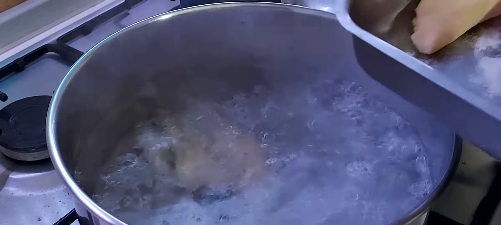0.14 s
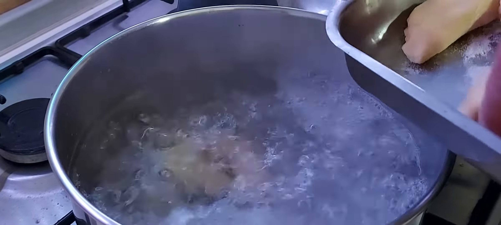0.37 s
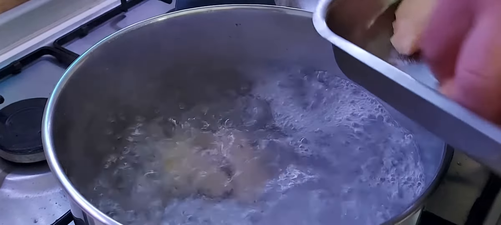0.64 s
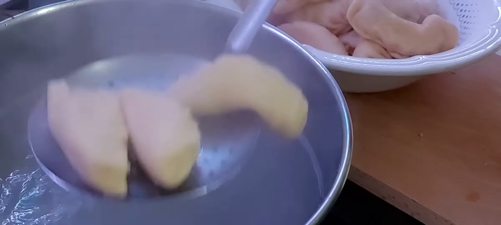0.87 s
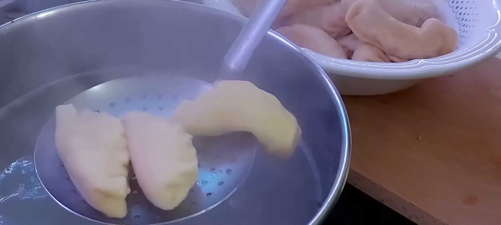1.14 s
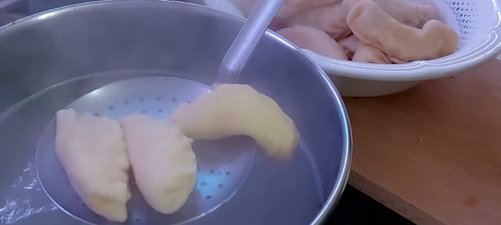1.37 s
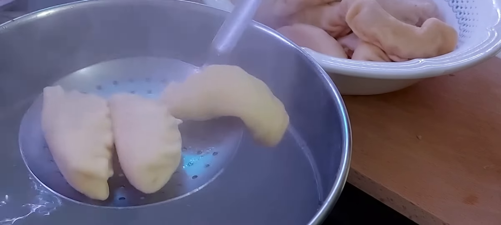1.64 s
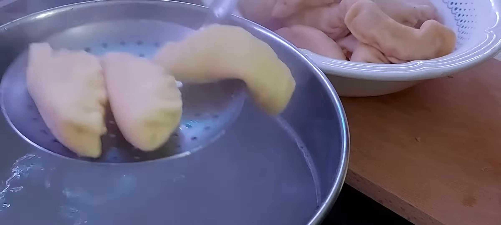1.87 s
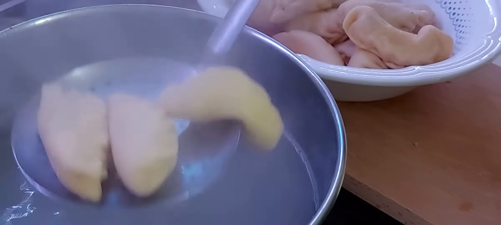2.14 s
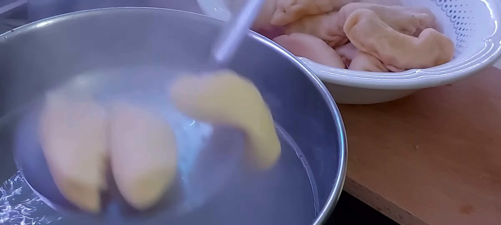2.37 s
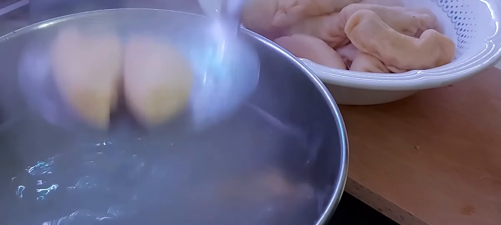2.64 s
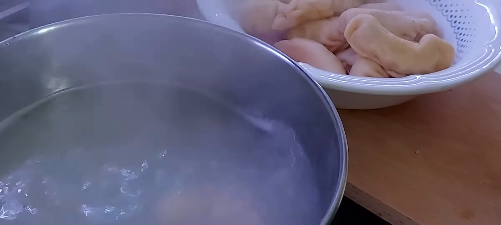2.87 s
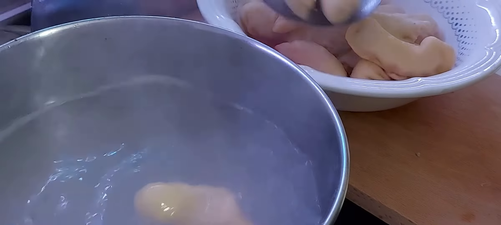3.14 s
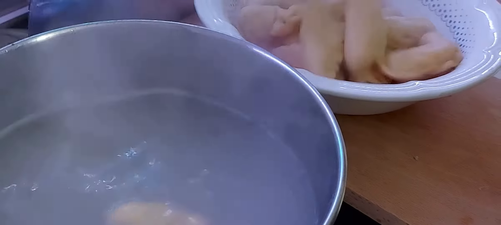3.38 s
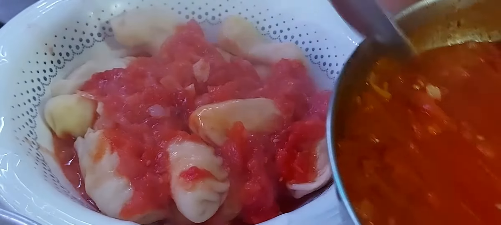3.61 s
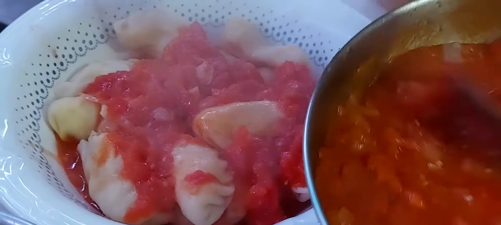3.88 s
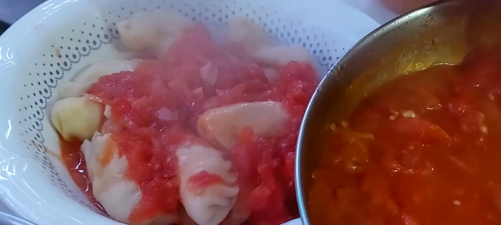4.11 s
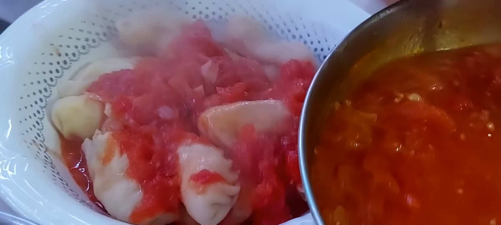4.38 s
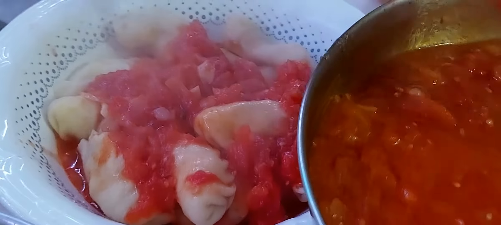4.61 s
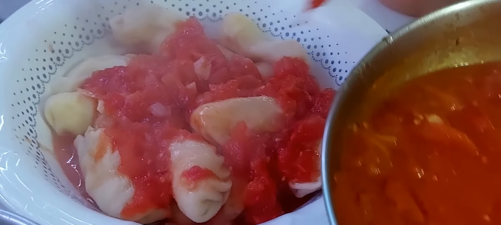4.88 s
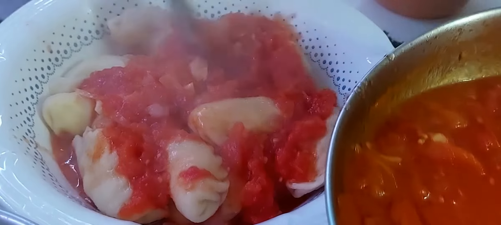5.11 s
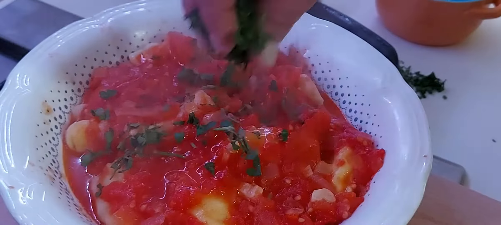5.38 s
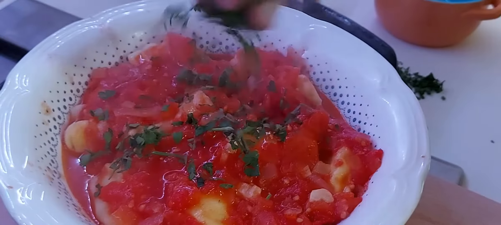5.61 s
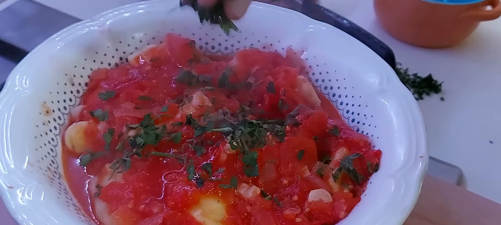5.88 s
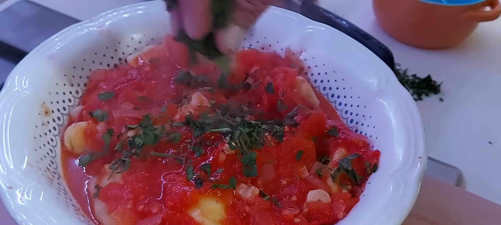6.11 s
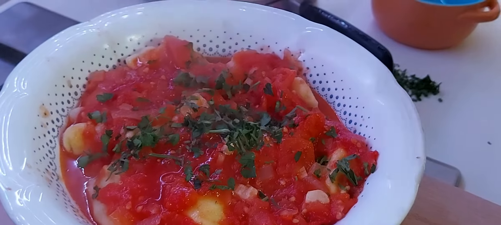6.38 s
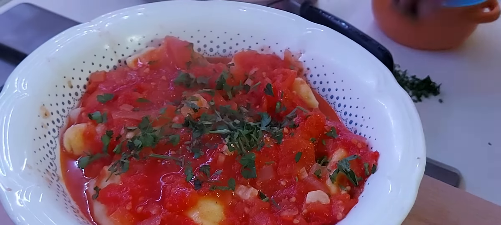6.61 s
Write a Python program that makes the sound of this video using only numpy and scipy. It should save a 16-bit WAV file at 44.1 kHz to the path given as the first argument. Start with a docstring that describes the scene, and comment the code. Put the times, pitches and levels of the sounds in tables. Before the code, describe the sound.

Water boils hard close by with one tray knock, cuts off abruptly, then quiet drips, and a spoon clinks and scrapes loudly in a metal pan.

```python
"""A spoon clinks, scrapes and thuds in a sauce pan: struck modes ring down, grit keeps them singing. Before it,
in a first scene, a pot boils close by until the scene changes, and a metal tray is knocked: more ringing modes.
Drips fall, food lands and herbs are sprinkled as ticks and puffs of noise; a ceramic bowl hums on two wavering
sines. Under all lie a lumpy low hum, the room tone and the microphone's hiss, as shaped noise."""
import sys
import numpy as np
from scipy import signal
from scipy.fft import rfft, irfft, next_fast_len
from scipy.io import wavfile
from scipy.ndimage import uniform_filter1d

SR = 44100
rng = np.random.default_rng(int(sys.argv[2]) if len(sys.argv) > 2 else 0)


def dump(signal):
    """Clip the signal to [-1, 1] and save it as 16-bit WAV at the path in sys.argv[1]."""
    limited = np.clip(np.atleast_2d(signal).T, -1, 1)
    pcm = np.round(limited * 32767).astype(np.int16)
    wavfile.write(sys.argv[1], SR, pcm)


def volts(x):
    """Linear amplitude factor 10**(x/20) for a level x in dB, scalar or array-like."""
    e = np.asarray(x, float) / 20
    return 10 ** e


N = 297673   # samples
BOIL_END_S = 0.738   # the scene changes here; the close boiling is heard only before it
CHOP_S = 5.287   # the ringing is chopped short here


def rms_one(x):
    """Scales to rms 1."""
    return x / np.sqrt(np.mean(x ** 2) + 1e-20)


def in_time(rows, outside=None):
    """Columns of a curve over time, one value a sample."""
    s, *columns = np.transpose(rows)
    return [np.interp(np.arange(N) / SR, s, c, outside, outside) for c in columns]


def at_hz(points, hz):
    """Reads a spectrum on a log frequency axis; nearly silent outside it."""
    point_hz, db = np.transpose(points)[:2]
    return np.interp(np.log(hz + 1), np.log(point_hz), db, -99, -99)


def drift(rate):
    """Slow random wander of spread 1, with `rate` new values a second."""
    knots = rng.standard_normal(400)
    path = np.interp(np.arange(N) * rate / SR, np.arange(400), knots)
    return rms_one(uniform_filter1d(path, size=400))


def coloured(x, spectrum):
    """Shapes the spectrum; rms 1."""
    size = next_fast_len(x.shape[-1])
    hz = np.arange(size // 2 + 1) * SR / size
    shaped = irfft(rfft(x, size) * volts(at_hz(spectrum, hz)), size)
    return rms_one(shaped[..., :x.shape[-1]])


# how alike the two ears are: (frequency [Hz], left-right likeness [-1 to 1])
LIKENESS = [(40, 0.93), (130, 0.9), (290, 0.78), (640, 0.31), (1400, -.05)]


def wide_noise():
    """Stereo noise, alike in the bass and almost unrelated in the treble."""
    hz = np.arange(N // 2 + 1) * SR / N
    point_hz, likeness = np.transpose(LIKENESS)
    alike = np.clip(np.interp(np.log(hz + 1), np.log(point_hz), likeness), -1, 1)
    mid, side = rfft(rng.standard_normal((2, N)))
    return irfft(np.sqrt(1 + alike) * mid + np.sqrt(1 - alike) * side * [[1], [-1]], N)


def panned(x, db):
    """Places a sound by its left-right level difference."""
    return x * volts(np.array([db / 2, -db / 2]).reshape(2, -1))


def band(x, lo_hz, hi_hz):
    """Band-pass filter."""
    return signal.sosfilt(signal.butter(2, [lo_hz, hi_hz], "band", fs=SR, output="sos"), x)


def ring(clicks, hz, t60):
    """A unit click sets a dying sine of starting height 1 ringing."""
    r, w = volts(-60 / (t60 * SR)), 2 * np.pi * hz / SR
    return signal.lfilter([0, np.sin(w)], [1, -2 * r * np.cos(w), r * r], clicks + 1e-18)


def grains(per_s, spread_db):
    """Random clicks of uneven size and either sign."""
    sizes = volts(spread_db * np.minimum(rng.exponential(1, N), 5)) * rng.choice([-1, 1], N)
    return sizes * (rng.random(N) < per_s / SR)


def add(out, x, s):
    """Mixes x into out, starting at s seconds."""
    at = round(s * SR)
    out[:, at:at + x.shape[1]] += x[:, :N - at]


# hiss spectrum: (frequency [Hz], density [dB per Hz])
HISS = [(530, -35), (900, -2.5), (956, -8), (1150, -9), (1230, -11), (1340, -9), (1630, -11.5), (2290, -7),
        (2750, -11.5), (3550, -8.5), (4360, -1.5), (7910, -4.5), (12100, 1), (15600, -9), (16400, -21)]


def microphone_hiss():
    """Steady noise of the microphone, unrelated in the two ears."""
    return volts(-61.5) * coloured(rng.standard_normal((2, N)), HISS)


# room spectrum: (frequency [Hz], density [dB per Hz])
ROOM_TONE = [(15, -58), (25, -15.5), (54, -9.5), (70, -5.5), (107, -12), (132, -5), (170, -27), (257, -11),
             (280, -10), (437, -27), (476, -26), (659, -30.5), (824, -25), (928, -46.5), (1500, -61.5),
             (1950, -68), (3300, -120)]
# room tone over time: (time [s], level [dB])
ROOM_LEVEL = [(0.76, -62), (1.29, -56.5), (1.6, -60.5), (2.19, -57), (2.56, -60.5), (3.45, -59),
              (3.9, -54.5), (4.3, -55), (4.88, -60.5), (5.26, -55), (5.6, -61.5), (6.25, -54.5),
              (6.75, -59.5)]


def room_tone():
    """Low, wide noise of the room, its level wandering."""
    level_db = in_time(ROOM_LEVEL)[0] + 1.8 * drift(11.0)
    return volts(level_db) * coloured(wide_noise(), ROOM_TONE)


# low hum over time: (time [s], level [dB])
HUM = [(0.0, -45.5), (0.21, -41.5), (0.28, -51), (0.38, -32), (0.49, -39.5), (0.71, -39), (0.77, -58.5),
       (1.71, -57), (1.94, -69), (1.97, -50), (2.59, -63.5), (3.03, -54.5), (3.31, -65), (3.87, -50),
       (3.97, -60), (4.08, -41.5), (4.3, -66), (4.4, -54), (5.86, -62), (5.96, -48.5), (6.45, -58),
       (6.56, -48), (6.6, -74), (6.75, -56)]
HUM_HZ, HUM_CLOSE_HZ, HUM_WAVER_HZ = 105.4, 115.7, 3.7   # far, near the burner, spread of the waver
HUM_LUMPS_PER_S, HUM_STEADY = 22, 0.8   # rate of the lumps; steady share beside lumps of spread 1


def low_hum():
    """One sine of wavering pitch and lumpy strength, higher near the burner."""
    near_burner = np.arange(N) / SR < BOIL_END_S
    hz = np.where(near_burner, HUM_CLOSE_HZ, HUM_HZ) + HUM_WAVER_HZ * drift(6)
    phase = 2 * np.pi * np.cumsum(hz) / SR
    lumps = (HUM_STEADY + drift(HUM_LUMPS_PER_S)) * np.sin(phase)
    lumps = lumps + drift(HUM_LUMPS_PER_S) * np.cos(phase)
    return volts(in_time(HUM)[0]) * rms_one(lumps)


# the boil over time: (time [s], rumble level [dB], bubbles level [dB], steam level [dB])
BOIL = [(0.0, -45.5, -54.5, -52.5), (0.136, -42.5, -54.5, -46.5), (0.29, -39.5, -52, -49),
        (0.424, -36, -49, -40), (0.578, -42, -52, -45.5), (0.702, -48, -55, -49), (0.735, -45, -50.5, -49)]
# rumble spectrum: (frequency [Hz], density [dB per Hz])
BOIL_RUMBLE = [(18, -39), (30, -13), (114, -1.5), (134, -4), (182, -17.5), (305, -11.5), (415, -21.5),
               (564, -19), (1000, -23), (1300, -46), (2200, -120)]
# steam spectrum: (frequency [Hz], density [dB per Hz])
STEAM = [(880, -36.5), (1500, -6), (2130, -4), (3480, -5.5), (4290, -2.5), (7900, -6), (11600, -4),
         (15400, -10), (16400, -32)]
# bursts of steam and spatter:
# (time [s], length [s], level before the band filter [dB], lowest [Hz], highest [Hz])
SURGES = [(0.067, 0.094, -43, 7500, 14000), (0.133, 0.021, -44.5, 2500, 15000),
          (0.165, 0.12, -38.5, 2400, 15000), (0.398, 0.1, -42, 2980, 14000),
          (0.52, 0.076, -40, 2480, 15000)]


def boil():
    """Rolling water rumbles, bubbles ring around the pot's bright note, steam fizzes and surges."""
    t = np.arange(N) / SR
    rumble_db, bubbles_db, steam_db = in_time(BOIL)
    rumble = volts(rumble_db + 2.9 * drift(20)) * coloured(wide_noise(), BOIL_RUMBLE)

    # each bubble is dealt one of 14 pitches; high ones die sooner
    clicks, dealt = grains(900, spread_db=0.5), rng.integers(0, 14, N)
    pitches = np.geomspace(1150, 1500, 14)
    bubbles = sum(ring(clicks * (dealt == k), hz, 25.0 / hz) for k, hz in enumerate(pitches))

    fizz = coloured(np.array([grains(9000, spread_db=0.5), grains(9000, spread_db=2.0)]), STEAM)
    steam = volts(steam_db) * fizz
    early = t[:SR]
    for s, length, db, lo_hz, hi_hz in SURGES:
        rise = np.clip((early - s) / 0.0124, 0, 1)
        fall = np.clip((s + length - early) / (0.46 * length), 0, 1)
        steam[:, :SR] += volts(db) * rise * fall * band(fizz[:, SR:2 * SR], lo_hz, hi_hz)
    stop = np.clip((BOIL_END_S - t) / 0.00201, 0, 1)
    return (rumble + volts(bubbles_db) * rms_one(bubbles) + steam) * stop


# sharp ticks: (time [s], level [dB], lowest [Hz], highest [Hz], left-right [dB])
TICKS = [(.775, -56.5, 3000, 14200, -2), (.835, -63, 3950, 6950, -6), (.884, -61, 4000, 14000, -8),
         (1.915, -60.5, 3000, 14000, -8), (2.678, -44.5, 3300, 15500, 2), (2.749, -50.5, 6000, 12400, -8),
         (2.792, -52, 3000, 12000, -7), (2.87, -54.5, 3000, 14900, -5.5), (3.33, -63.5, 7000, 11000, -11),
         (3.369, -54, 4020, 15500, -16), (4.449, -53, 4000, 14940, -13), (4.46, -48.5, 6000, 15500, -13.5),
         (4.472, -51, 5500, 10040, -6), (4.564, -58, 9000, 15300, -9.5), (5.87, -64, 7000, 14000, -7)]
# wet drips and splats with a tail: (time [s], level [dB], lowest [Hz], highest [Hz], left-right [dB])
DRIPS = [(.774, -49.5, 587, 1200, 0), (.776, -54, 2050, 2490, -3), (.86, -56.5, 1886, 2630, 1),
         (1.345, -57.5, 351, 776, -2), (2.678, -55, 1200, 3530, -0.5), (2.792, -53, 1600, 3050, 1),
         (2.87, -48, 1520, 3400, -2), (4.455, -55, 2010, 3200, 1), (4.478, -47, 297, 5500, -3.5),
         (5.102, -42.5, 8270, 15500, -13), (5.102, -49, 1300, 8000, -4), (5.113, -40, 3080, 4800, -6),
         (5.186, -49.5, 1500, 14140, -3), (5.188, -46.5, 299, 4100, -4.5), (6.116, -57, 1500, 9000, -7),
         (6.72, -58, 3000, 15800, -9.5)]
# soft rustles and thumps: (time [s], level [dB], lowest [Hz], highest [Hz], left-right [dB])
RUSTLES = [(1.9, -62.5, 1800, 2780, 0), (2.29, -52, 10580, 15500, -5.5), (2.733, -49, 504, 15400, -13),
           (3.11, -47.5, 9360, 15100, -8), (3.375, -56.5, 397, 5020, 1), (4.662, -62.5, 353, 1190, 0),
           (5.08, -58, 400, 1290, -4), (6.125, -62, 300, 1100, -3), (6.378, -58, 296, 1000, 4)]
# each kind: (sharp start over the puff [dB], t60 of the puff [s])
TICK, DRIP, RUSTLE = (7, 0.04), (3.8, 0.17), (0, 0.25)


def splats():
    """Drips, food and herbs: a sharp start and a puff of noise that swells and dies in its own band."""
    out, t = np.zeros((2, N)), np.arange(SR // 4) / SR
    for rows, (start_db, t60) in [(TICKS, TICK), (DRIPS, DRIP), (RUSTLES, RUSTLE)]:
        puff = volts(-60 * t / t60) * (1 - np.exp(-t / (0.055 * t60)))
        shape = puff + volts(start_db - 60 * t / 0.027)
        for s, db, lo_hz, hi_hz, side_db in rows:
            mid, side = rng.standard_normal((2, len(t)))
            noise = band(mid + 0.5 * side * [[1], [-1]], lo_hz, hi_hz)
            noise = rms_one(band(noise, lo_hz / 1.12, hi_hz * 1.3))   # steepens the band's edges
            add(out, panned(volts(db) * noise * shape, side_db), s)
    return out


# soft touches on the bowl:
# (time at fullest [s], upper mode level [dB], lower mode level [dB], swell length [s])
BOWL_TOUCH = [(3.473, -49, -75, 0.023), (3.53, -60, -85.5, 0.032), (4.193, -47, -58, 0.027),
              (4.385, -75.5, -80, 0.026), (4.505, -44.5, -50, .03), (4.7, -62.5, -69, .04),
              (5.031, -60, -75, .03), (5.098, -40.5, -54, 0.024), (5.137, -74, -68, 0.017),
              (5.207, -41, -48.5, 0.02), (5.261, -54, -60, 0.021), (5.383, -73, -83, 0.037),
              (5.523, -70, -85, .04), (5.789, -62, -82, .025), (5.86, -59, -80, 0.022),
              (5.92, -77, -87, 0.017), (6.157, -57, -52.5, 0.038), (6.315, -70, -69, .06),
              (6.393, -48.5, -60, 0.016), (6.427, -52.5, -45, 0.03), (6.551, -62, -70, 0.017)]
# the bowl's upper and lower mode: (frequency [Hz], spread of the pitch waver [Hz])
BOWL = [(842, 5.93), (520, 10.9)]
# a faint, wandering hum of the upper mode: its start and middle level; then the decay of the touches
BOWL_START_S, BOWL_FAINT_DB, BOWL_T60_S = 3.42, -80, 0.15


def bowl():
    """Each soft touch swells two low modes, which ring down, wavering a little, over a dull thud."""
    t = np.arange(N) / SR
    swells = np.zeros((2, N))
    swells[0] = volts(BOWL_FAINT_DB + 5.0 * drift(20)) * (t > BOWL_START_S)
    for s, upper_db, lower_db, length in BOWL_TOUCH:
        near = slice(round((s - 0.15) * SR), round((s + 0.3) * SR))
        since = t[near] - s
        touch = np.exp(-2 * (since / length) ** 2)
        ringing = (since > 0) * volts(-4.0 - 60 * np.abs(since) / BOWL_T60_S)
        heard = (s > CHOP_S) | (t[near] < CHOP_S)
        swells[:, near] += volts(np.array([[upper_db], [lower_db]])) * np.maximum(touch, ringing) * heard
    thud = rms_one(band(band(rng.standard_normal(N), 200, 690), 210, 890))
    out = volts(-6.0) * swells[1] * thud
    for (hz, waver_hz), swell in zip(BOWL, swells):
        phase = 2 * np.pi * np.cumsum(hz + waver_hz * drift(40)) / SR
        out = out + swell * volts(1.6 * drift(50)) * np.sin(phase)
    return panned(out, -1.5)


def blow(pitches, levels_db, t60s, crack, crack_db, crack_s):
    """One strike: modes ring down, beating with a close twin, over a crack of noise with a faint tail."""
    t = np.arange(N // 8) / SR
    hz, db, t60 = np.array([pitches, levels_db, t60s])[:, :, None]
    twin_hz = hz * (1 + 0.0027 * rng.standard_normal(hz.shape))
    contact = np.exp(-(t / crack_s) ** 2)
    damped_db = -7.0 * (1 - contact)   # the first swing is soon damped by the contact
    pair = np.sin(2 * np.pi * hz * t) + 0.34 * np.sin(2 * np.pi * twin_hz * t)
    rings = volts(db - 60 * t / t60 + damped_db) * pair
    mid, side = coloured(rng.standard_normal((2, N // 8)), crack)
    noise = mid + 0.9 * side * [[1], [-1]]
    shape = contact + 0.4 * np.exp(-t / 0.0012) + volts(-21 - 60 * t / 0.25)
    return rings.sum(axis=0) + volts(crack_db) * noise * shape * np.clip(t / 0.001, 0, 1)


# the knock: (time [s], ring level [dB], left-right [dB])
TRAY_KNOCK = [(0.291, -18.5, -3.5)]
# the tray's modes: (frequency [Hz])
TRAY_HZ = [250, 350, 581, 740, 880, 1125, 1240, 1572, 1970, 2514, 3542, 4479, 5362, 7693, 10850]
# the same modes in that order: (level [dB], t60 [s])
TRAY = [(-11, 0.28), (-3, 0.34), (-5.5, 0.25), (-13, .2), (0, 0.14), (-12, 0.18), (-5, 0.092), (-16, .2),
        (-20, .2), (-12.5, 0.17), (-22.5, .1), (-17.5, .1), (-23, .1), (-20, .1), (-9, .05)]
# spectrum of the knock's noise: (frequency [Hz], density [dB per Hz])
TRAY_CRACK = [(88, -45.5), (150, -15), (548, -10.5), (736, -10), (896, -2.5), (1680, -22.5), (1930, -20),
              (3030, -24.5), (10900, -21), (15200, -30.5), (16400, -44)]


def tray_knock():
    """A knock sets the metal tray's modes ringing under a short crack."""
    out = np.zeros((2, N))
    levels_db, t60s = np.transpose(TRAY)
    for s, db, side_db in TRAY_KNOCK:
        knock = blow(TRAY_HZ, levels_db, t60s, TRAY_CRACK, crack_db=0.5, crack_s=0.01)
        add(out, panned(volts(db) * knock, side_db), s)
    return out


# spoon dragged along the pan: (time [s], level [dB], left-right [dB])
SCRAPE = [(3.825, -32, -4.5), (3.841, -26, -4), (3.907, -16.5, -6.5), (4.007, -36, -5), (4.043, -29, -10),
          (4.057, -42.5, -4), (4.141, -53, -2), (4.2, -68, -4)]
# spectrum of the rasp: (frequency [Hz], density [dB per Hz])
SCRAPE_COLOUR = [(900, -35.5), (1500, -14.5), (2300, -18.5), (3200, -14.5), (4400, -2.5), (5500, -5.5),
                 (7600, -3.5), (10000, -6), (12500, -3.5), (14500, -13.5), (15400, -13.5)]
# the pan's modes, for scrape and strikes: (frequency [Hz])
PAN_HZ = [269, 506, 724, 926, 1245, 1400, 2659, 2900, 3140, 3903, 4550, 5292, 6514, 6900, 7620, 7768, 8770,
          9010, 10150, 11200, 12020, 12700, 13010, 13340, 14120, 14850]
# the same modes in that order: (struck on the wall [dB], struck on the bottom [dB], rubbed [dB],
# t60 when struck, before the strike's own limit [s])
PAN = [(-20, -7.5, -35, 0.6), (-40, -9.5, -28, 0.28), (-11.5, -3.5, -7, 0.37), (-33, -12, -17, 0.17),
       (-20, -20.5, -17, .3), (-41, -31, -7.5, .1), (-47, -5, -44, 0.53), (-36.5, -30.5, -3.5, .2),
       (-34, -22, -2, 0.23), (-14, -24, 1, 0.45), (-16.5, -26.5, -6, .3), (-30, -39, -6, .2),
       (-5.5, -42, -4.5, 0.17), (-27, -40, 0, 0.19), (-36, -32, -7, 0.2), (-8, -32, 1, 0.24),
       (-25.5, -41, -8, 0.268), (-23.5, -43, -12, 0.48), (-10.5, -38.5, 2.5, .1), (-26, -57.5, -3.5, .3),
       (-15.5, -50, -9, .14), (-20, -48, -6.5, 0.29), (-8, -41.5, -9.5, 0.12), (-1, -43, -2, 0.086),
       (-10, -42.5, -10, 0.21), (-12.5, -43, -10, .1)]


def spoon_scrape():
    """Grit under the spoon: a patchy rasp plus the pan's modes, waxing and waning as the contact moves."""
    db, side_db = in_time(SCRAPE)
    t = np.arange(N) / SR
    on = np.clip((t - SCRAPE[0][0]) / 0.042, 0, 1) * np.clip((SCRAPE[-1][0] - t) / 0.05, 0, 1)
    grit, other = grains(6000 * volts(3.6 * drift(60)), spread_db=4.5), grains(6000, spread_db=5)
    rasp = coloured(np.array([grit + 1.0 * other, grit - 0.87 * other]), SCRAPE_COLOUR)
    edges = np.geomspace(1000, 16000, 13)   # Hz; each band between flickers by itself
    rasp = rms_one(sum(volts(2.5 * drift(60)) * band(rasp, lo, hi) for lo, hi in zip(edges, edges[1:])))

    rubbed_db = np.transpose(PAN)[2]
    sung = [volts(mode_db + 5.0 * drift(35)) * rms_one(ring(grit, hz, 0.06))
            for hz, mode_db in zip(PAN_HZ, rubbed_db)]
    high = volts(-4) * rms_one(sum(sung[6:]))
    low = volts(-16 - 0.43 * (db + 25)) * rms_one(sum(sung[:6]))   # stands out more in a soft scrape
    return on * volts(db) * panned(rasp + high + low, side_db)


# spoon on pan: (time [s], ring level [dB], left-right [dB], crack over ring [dB], 0 wall or 1 bottom)
SPOON = [(3.679, -31, -4.5, 0.5, 0), (3.816, -24, -7, 4, 0), (3.844, -37.5, -1, 10, 0),
         (4.056, -24.5, -2, 2, 1), (5.117, -38, 1, -17.5, 1), (5.812, -53.5, -7, -27, 1)]
# noise of a strike on the wall: (frequency [Hz], density [dB per Hz])
PAN_CRACK = [(180, -46.5), (300, -1), (479, -22.5), (741, -4), (2430, -18), (2920, -9), (4750, -3.5),
             (5520, -4.5), (9600, -3.5), (13600, 1.5), (16400, -22.5)]
# noise of a thud on the bottom: (frequency [Hz], density [dB per Hz])
BODY_CRACK = [(88, -11), (150, -5.5), (403, -7), (713, -6.5), (1340, -12), (1590, -17), (2410, -22.5),
              (2650, -9.5), (3440, -21), (6000, -25.5), (7800, -49), (13200, -120)]
LIGHT_TAP_DB = -37   # strikes below this count as light


def spoon_strikes():
    """The spoon clinks on the pan's wall or thuds on its bottom, each waking the modes differently."""
    out = np.zeros((2, N))
    wall_db, bottom_db, _, t60 = np.transpose(PAN)
    for s, db, side_db, crack_db, bottom in SPOON:
        if bottom > 0.5:
            levels_db, crack, crack_s, longest_s = bottom_db, BODY_CRACK, 0.017, 0.16
        else:
            levels_db, crack, crack_s, longest_s = wall_db, PAN_CRACK, 0.011, 0.5
        if db < LIGHT_TAP_DB:   # light taps wake little bass: 9 dB an octave less
            levels_db = levels_db + 9 * np.log2(np.minimum(PAN_HZ, 2700) / 2700)
        strike = blow(PAN_HZ, levels_db, np.minimum(t60, longest_s), crack, crack_db, crack_s)
        add(out, panned(volts(db) * strike, side_db), s)
    return out


KITCHEN_T60_S, WALL_CUT_HZ, KITCHEN_DB = 0.33, 5000, -4.5   # decay below the cut; cut; level of the echo


def kitchen(x):
    """Dense dying reflections, other ones in each ear; the treble dies sooner."""
    t = np.arange(SR // 2) / SR
    noise = rng.standard_normal((2, len(t)))
    dull = signal.sosfilt(signal.butter(1, WALL_CUT_HZ, fs=SR, output="sos"), noise)
    tail = dull * volts(-60 * t / KITCHEN_T60_S) + (noise - dull) * volts(-85 * t / KITCHEN_T60_S)
    tail = tail * np.clip((t - 0.003) / 0.006, 0, 1)
    tail = tail / np.sqrt(np.sum(tail ** 2, axis=1, keepdims=True))
    return signal.fftconvolve(0.67 * x + 0.12 * x[::-1], tail, axes=1)[:, :N]


def scene():
    """Near sounds with their echo, chopped silent for 0.4 s, over bowl, boil and background."""
    t = np.arange(N) / SR
    background = microphone_hiss() + room_tone() + low_hum()
    small = splats()
    metal = tray_knock() + spoon_scrape() + spoon_strikes()
    near = metal + small + volts(KITCHEN_DB) * kitchen(metal + 0.5 * small)
    near = signal.sosfilt(signal.butter(2, 200, "high", fs=SR, output="sos"), near)
    near = signal.sosfilt(signal.butter(10, 15700, fs=SR, output="sos"), near)
    near = near * ((t < CHOP_S) | (t > CHOP_S + 0.4))
    return background + boil() + bowl() + near


def roll_off(x):
    """The treble ends steeply here."""
    return signal.sosfilt(signal.butter(12, 16660, fs=SR, output="sos"), x)


RIGHT_LAG_S = 0.00013


def record(dry):
    """The microphone drops the deepest bass; sound reaches its right port a little late; peaks are rounded."""
    dry = signal.sosfilt(signal.butter(4, 38, "high", fs=SR, output="sos"), dry)
    late = np.interp(np.arange(N) - round(RIGHT_LAG_S * SR), np.arange(N), dry[1])
    mix = 0.91 * np.tanh(np.array([dry[0], late]) / 0.87)
    return roll_off(mix)


dry = scene()
out = record(dry)
dump(out)
```